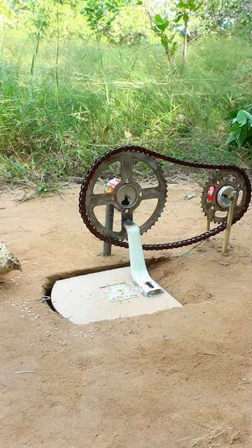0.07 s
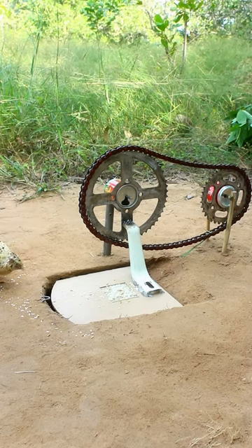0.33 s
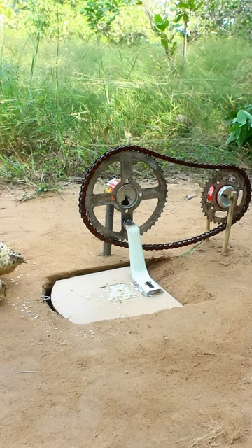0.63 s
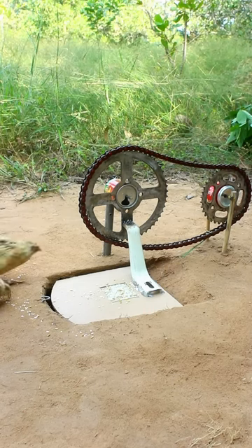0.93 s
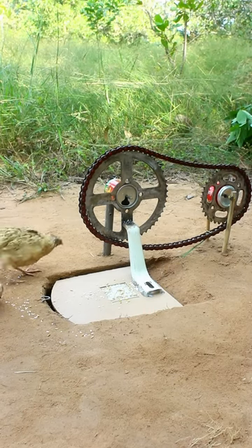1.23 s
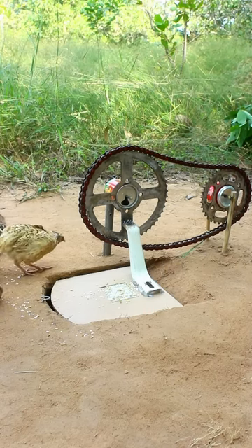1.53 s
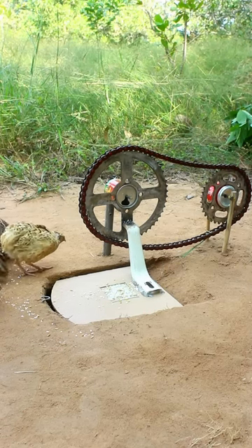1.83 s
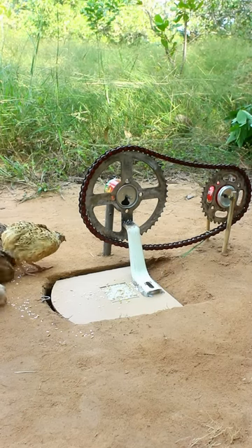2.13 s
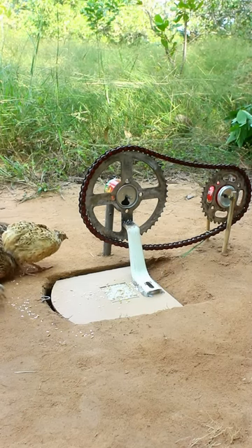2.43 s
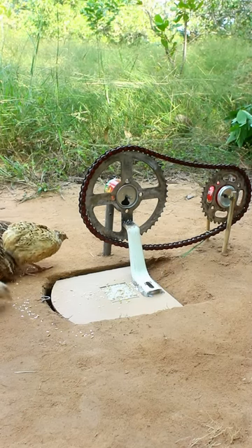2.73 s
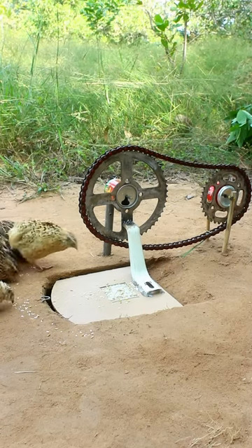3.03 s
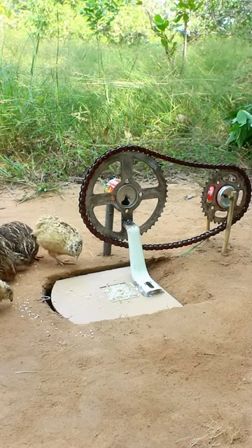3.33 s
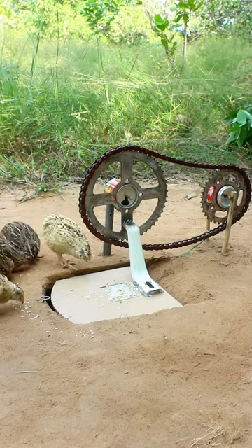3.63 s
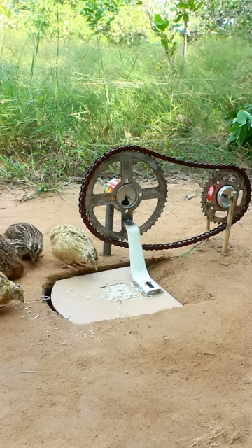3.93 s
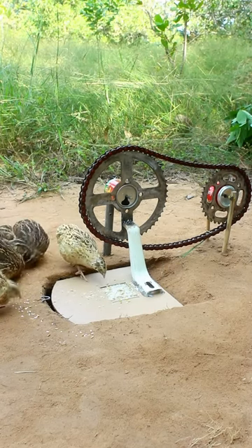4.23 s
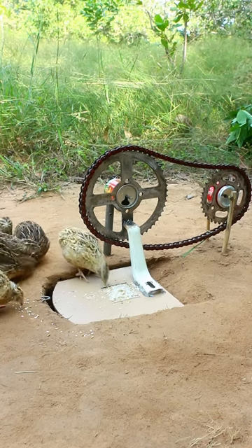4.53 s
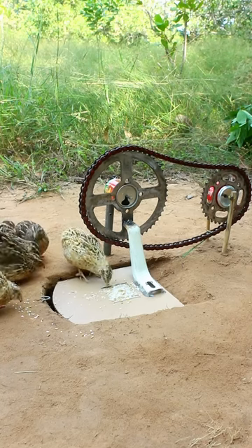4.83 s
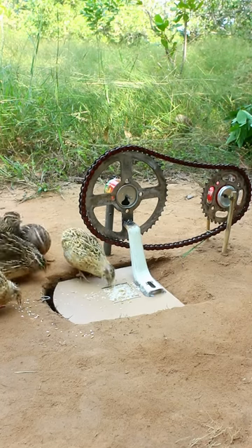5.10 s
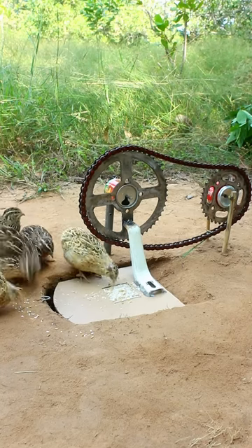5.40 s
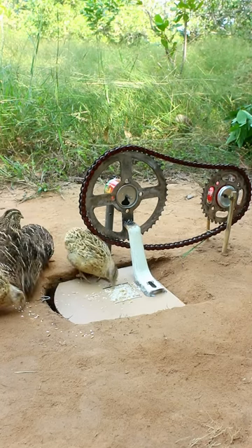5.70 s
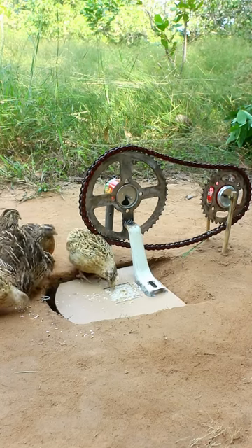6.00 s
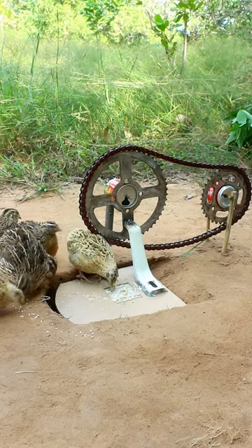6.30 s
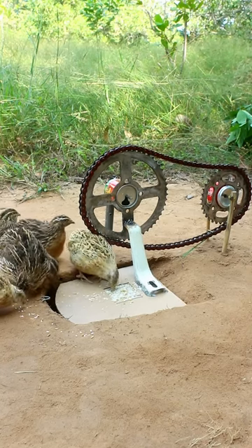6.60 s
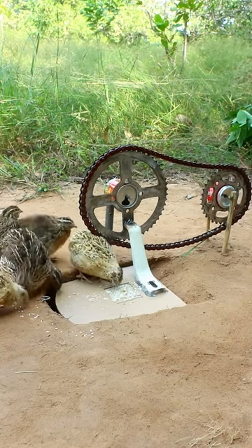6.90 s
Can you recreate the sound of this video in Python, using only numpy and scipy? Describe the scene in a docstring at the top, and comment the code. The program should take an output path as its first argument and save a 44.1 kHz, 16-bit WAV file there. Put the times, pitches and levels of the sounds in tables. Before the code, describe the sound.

A steady open-air hiss and low rumble runs throughout, about seven seconds. From 0.5 seconds, birds give soft, scattered two-note whistles, peeps, chirps and coos, with raspy twittering around 3.4 to 4.4 seconds and the last peep near 5.4. Faint light clacks and a rustle of sand come at about 2.7 seconds.

A faint first peck at 4.2 seconds and soft footfalls lead into the main sound: from 4.6 seconds to the end, a quail pecks grain off a thin platform close by, roughly four times a second. These sharp, crunchy taps are much louder than the background, and each rings the board briefly. A harder clack lands at 4.7 seconds amid rustling sand. Loose seeds snap and skitter between 4.6 and 5.2 seconds, and again lightly near 6.7. Feet thud softly around 5.6, and one of the strongest pecks falls at 6.6.

```python
"""Sharp, crunchy pecks on ringing board, close by: a quail eats grain off a thin platform over a pit.
Each peck is a blow, a rebound and a lift-off that ring the platform and crunch the seed.
Loose seeds skitter, feet thud, sand rustles and something harder clacks lightly.
Birds whistle and twitter softly over a steady open-air hiss and rumble."""
import sys
import numpy as np
from scipy import signal
from scipy.fft import rfft, irfft
from scipy.io import wavfile

SR = 44100
rng = np.random.default_rng(int(sys.argv[2]) if len(sys.argv) > 2 else 0)


def materialize(psi):
    """Save the field psi as 16-bit PCM at rate SR to the path in sys.argv[1].

    A 1-D psi becomes a single channel; in a 2-D psi each row is a channel.
    """
    bounded = np.clip(np.atleast_2d(psi).T, -1, 1)
    quanta = np.round(bounded * 32767).astype(np.int16)
    wavfile.write(sys.argv[1], SR, quanta)


N = 306495
T = np.arange(N) / SR
RING_T = np.arange(SR // 4) / SR

# seed noise spectrum: f/Hz, level/dB
SEED_SPECTRUM = [(300, -1.5), (900, 3), (2200, 9), (3200, -1), (5000, -1.5), (7100, 5), (8400, 2.5),
                 (10500, 5.5), (13000, -0.5), (16000, -7)]
# showers of scattered seed: t/s, length/s, level/dB
SHOWERS = [(4.565, .14, -52), (4.779, 0.063, -53), (5.011, 0.11, -55.5), (5.084, 0.089, -56),
           (6.65, 0.076, -54.5)]


def undb(db):
    """Decibels to gain."""
    return 10 ** (np.asarray(db) / 20)


def add(track, start_s, sound):
    """Mix a sound into a track."""
    i = max(int(start_s * SR), 0)
    track[i:i + len(sound)] += sound[:N - i]


def decay(t60_s):
    """Envelope falling 60 dB in t60_s."""
    return np.exp(-np.log(1000) * RING_T / t60_s)


def highpass(x, hz, order):
    """Butterworth high-pass."""
    return signal.sosfilt(signal.butter(order, hz, "high", fs=SR, output="sos"), x)


def bin_gains(points, size):
    """FFT bin gains from (f/Hz, level/dB) points, joined over log frequency."""
    hz, db = np.transpose(points)
    return undb(np.interp(np.log(np.fft.rfftfreq(size, 1 / SR) + 1), np.log(hz), db))


def colour(x, points, size=1024):
    """Minimum-phase filter of unit power gain, shaped by (f/Hz, level/dB) points."""
    cepstrum = irfft(np.log(bin_gains(points, size)))
    cepstrum[1:size // 2] *= 2
    cepstrum[size // 2 + 1:] = 0
    response = irfft(np.exp(rfft(cepstrum)))
    return signal.fftconvolve(x, response / np.linalg.norm(response))[:len(x)]


def crackle(rate_hz, spread_db):
    """Dense clicks of uneven size, rms 1."""
    clicks = (rng.random(N) < rate_hz / SR) * rng.choice([-1, 1], N)
    clicks = clicks * undb(spread_db * np.minimum(rng.exponential(size=N), 4))
    return clicks / clicks.std()


def jitter(t, rate_hz):
    """Random values joined by straight lines."""
    return np.interp((t - t[0]) * rate_hz, np.arange(256), rng.standard_normal(256))


def air(mid_rms_db=-52.5):
    """Steady rumble, alike in both ears, under a wide hiss."""
    # open-air spectrum: f/Hz, relative level/dB
    spectrum = [(12, -40), (20, -6), (26, -7), (95, -0.5), (192, -7), (221, -10.5), (355, -15.5),
                (554, -17.5), (603, -19), (942, -21), (1020, -22), (3220, -22), (4250, -25), (13700, -27),
                (15800, -29)]
    # stereo width: f/Hz, side re mid/dB
    width = [(30, -3.5), (100, -18.5), (300, -7), (1000, -2.5), (3000, -2.5), (8000, 0.5), (15000, 0)]
    gain = bin_gains(spectrum, N)
    mid = irfft(rfft(rng.standard_normal(N)) * gain, N)
    side = irfft(rfft(rng.standard_normal(N)) * gain * bin_gains(width, N), N)
    return undb(mid_rms_db) * np.array([mid + side, mid - side]) / mid.std()


def surroundings(x, t60_s=0.078, build_s=0.0052, wet_db=-23, lowest_hz=350):
    """Ground and bushes scatter a faint short tail to each side; long waves pass them by."""
    tails = rng.standard_normal((2, len(RING_T))) * decay(t60_s) * (1 - np.exp(-RING_T / build_s))
    scattered = highpass(x, lowest_hz, order=1)
    wet = [signal.fftconvolve(scattered, tail / np.linalg.norm(tail))[:N] for tail in tails]
    return undb(wet_db) * np.array(wet)


def note(turn_s, shape, turn_hz, db, rasp_db=-15, waver=0.013, overtone_db=-22, bend=1.4):
    """Wavering bird note gliding through a turning pitch; returns start/s, sound."""
    before_s, after_s, start_ratio, end_ratio = shape
    t = np.arange(-before_s, after_s, 1 / SR)
    from_turn = np.abs(np.where(t < 0, t / before_s, t / after_s)).clip(0, 1)
    hz = turn_hz * (1 + (np.where(t < 0, start_ratio, end_ratio) - 1) * from_turn ** bend)
    phase = 2 * np.pi * np.cumsum(hz * (1 + waver * jitter(t, rate_hz=424))) / SR
    tone = np.sin(phase) + undb(overtone_db) * np.sin(2 * phase)
    hoarse = jitter(t, rate_hz=900) * np.sin(phase) + jitter(t, rate_hz=830) * np.cos(phase)
    rasp = undb(rasp_db)
    swell = (1 - from_turn ** 6) / np.hypot(1, rasp)
    return turn_s - before_s, undb(db) * swell * (tone + rasp * hoarse)


def birds(call_gap_s=.067, call_high_hz=1377, twitter_step_s=.04, twitter_spread=0.0287):
    """Clear two-note calls and peeps, hoarser chirps, soft coos, raspy twitter at uneven pitch."""
    # glides: time before turn/s, time after/s, start and end pitch re turn
    low_swoop = (0.048, 0.0142, 1.38, 2.2)
    high_swoop = (.041, 0.0126, 1.85, 1.57)
    peep = (.034, 0.0183, 1.55, 1.65)
    chirp = (.031, 0.0146, .42, .72)
    coo = (0.028, 0.017, 1.04, 0.94)
    twitter = (.02, .018, 1.15, 1.14)
    # two-note calls, at the first turn: t/s, f/Hz, level/dB
    calls = [(0.754, 1050, -56), (1.226, 1030, -63), (1.452, 1146, -56.5), (2.85, 1094, -56),
             (4.131, 1035, -50.5)]
    # single peeps, at the turn: t/s, f/Hz, level/dB
    peeps = [(1.002, 1550, -53), (4.638, 1506, -50), (5.441, 1413, -51.5)]
    # rising chirps, at the top: t/s, f/Hz, level/dB
    chirps = [(1.196, 1154, -59), (1.929, 1130, -55), (2.426, 1510, -50.5)]
    # nearly level coos: t/s, f/Hz, level/dB
    coos = [(1.965, 462, -51.5), (1.966, 756, -56), (5.362, 1178, -54.5)]
    # twitter bouts: t/s, length/s, f/Hz, level/dB
    bouts = [(0.47, .04, 2880, -63), (3.413, .08, 3085, -50.5), (3.602, .12, 3230, -58),
             (4.208, .08, 2750, -55), (4.315, .12, 3230, -60)]
    out = np.zeros(N)
    for s, hz, db in calls:
        add(out, *note(s, low_swoop, hz, db))
        add(out, *note(s + call_gap_s, high_swoop, call_high_hz, db + 2))
    for s, hz, db in peeps:
        add(out, *note(s, peep, hz, db))
    for s, hz, db in chirps:
        add(out, *note(s, chirp, hz, db, rasp_db=-9))
    for s, hz, db in coos:
        add(out, *note(s, coo, hz, db))
    for s, length_s, hz, db in bouts:
        for turn_s in np.arange(s + twitter_step_s / 2, s + length_s, twitter_step_s):
            turn_hz = hz * (1 + twitter_spread * rng.standard_normal())
            add(out, *note(turn_s, twitter, turn_hz, db, rasp_db=0))
    return out


def sand():
    """Fine grit shifts under feet and feathers."""
    # rustle envelope: t/s, level/dB
    rustle = [(0, -67.5), (2.55, -67), (2.68, -58), (2.9, -56), (3.0, -67), (4.35, -62.5), (4.6, -52.5),
              (4.75, -59.5), (6.95, -67.5)]
    # grit spectrum: f/Hz, level/dB
    spectrum = [(300, -6.5), (1200, -6), (2600, -5), (4500, -11), (8000, -14), (16000, -18.5)]
    grit = colour(crackle(rate_hz=2800, spread_db=3.5), spectrum)
    return undb(np.interp(T, *np.transpose(rustle))) * grit


def strike(modes, contact_ms, weights_db, crowded_db, crowded_t60_s):
    """A force pulse drives main modes and a wash of crowded ones; longer contact sounds duller."""
    # spectrum of the small, crowded modes: f/Hz, level/dB
    crowded = [(150, -33.5), (400, -1.5), (600, -2.5), (1000, -9.5), (2000, -5.5), (3200, -2), (5000, -41),
               (16000, -60)]
    hz, db, t60_s = np.transpose(modes)[:, :, None]
    ring = (undb(db + weights_db[:, None]) * decay(t60_s) * np.cos(2 * np.pi * hz * RING_T)).sum(0)
    wash = colour(rng.standard_normal(len(RING_T)) * decay(crowded_t60_s), crowded)
    rise_s = max(contact_ms, .02) / 4000
    t = RING_T[:SR // 100]
    force = t * np.exp(-t / rise_s)
    return signal.fftconvolve(ring + undb(crowded_db) * wash, force / force.sum())[:len(RING_T)]


def clacks():
    """Light, bassless knocks on something harder than the platform."""
    # knocks: t/s, level/dB, contact/ms
    knocks = [(.311, -54, .2), (2.6682, -50.5, .03), (2.74, -60, .05), (2.799, -55, .23),
              (4.6462, -44.5, 0.087), (4.7185, -25.5, .64), (4.862, -53, .05)]
    # hard object's modes: f/Hz, level/dB, t60/s
    modes = [(940, 3, 0.0061), (1270, 3, 0.023), (1960, -25, 0.018), (2114, 9, 0.022), (2360, 2, 0.016),
             (2930, 3, 0.028)]
    out = np.zeros(N)
    for s, db, contact_ms in knocks:
        weights_db = rng.standard_normal(len(modes))
        add(out, s, undb(db) * strike(modes, contact_ms, weights_db, crowded_db=-6, crowded_t60_s=0.091))
    return highpass(out, 600, order=2)


def bounces(count=3, above_shower_db=10, spread_db=8.5, top_hz=7600):
    """A few seeds land at random in each shower: t/s, level/dB, f/Hz."""
    return [(s + length_s * rng.random(),
             db + above_shower_db + spread_db * rng.standard_normal(),
             top_hz * rng.uniform(0.86, 1.0))
            for s, length_s, db in SHOWERS for _ in range(count)]


def seeds(tick_s=0.0012, tick_db=-5, ring_s=0.00085, ring_db=-7):
    """A snapping or bouncing seed gives a sharp tick with a very short ring."""
    # single seeds snapping: t/s, level/dB, f/Hz
    snaps = [(4.6029, -33, 9150), (4.85, -38, 8950), (4.9164, -31, 6900), (4.948, -38, 7500),
             (5.085, -26.5, 8700), (5.092, -28.5, 6860), (5.109, -35, 7840), (5.1269, -32, 10600),
             (5.6423, -42, 8000)]
    out = np.zeros(N)
    for s, db, hz in snaps + bounces():
        tick = undb(tick_db) * rng.standard_normal(len(RING_T)) * np.exp(-RING_T / tick_s)
        ring = undb(ring_db) * np.sin(2 * np.pi * hz * RING_T) * np.exp(-RING_T / ring_s)
        add(out, s, undb(db) * (tick + ring))
    return colour(out, SEED_SPECTRUM)


def blows(rebound_s=.003, rebound_ratio=0.53, lift_ratio=0.47, step_low_db=28):
    """Beak and foot contacts: t/s, level/dB, contact/ms, lowest-mode boost/dB, crunch/dB."""
    # pecks: t/s, level/dB, contact/ms, lowest-mode boost/dB, crunch/dB, rebound/dB,
    # lift-off delay/s, lift-off/dB; crunch, rebound and lift-off levels re the blow
    pecks = [(4.1546, -49.5, 0.35, 28, -18, -21, 0.0054, -4),
             (4.5545, -24, 0.89, -5, -8.5, -9, 0.0093, -15),
             (4.7806, -18.5, 0.87, 9, -16.5, -12, 0.023, -15.5),
             (4.9926, -17.5, .44, 5, -5, -7.5, 0.0063, -24),
             (5.2778, -25, 0.43, 5, -3.5, -8.5, .016, -15.5), (5.6128, -40.5, .17, 18, 7.5, -9, 0.0073, -9),
             (5.7262, -21, 0.76, 6, -10, -2, 0.01, -21), (5.9389, -25, 1.03, 0.5, -9, -6.5, 0.012, -17.5),
             (6.1401, -20.5, 1.04, -9, -4, -12.5, .008, -2.5),
             (6.3726, -18.5, 0.7, 0.5, -7.5, -11, .022, -10.5),
             (6.6186, -15.5, 1.13, 3, -12.5, -7, 0.016, -14), (6.829, -28, 1.8, 17.5, -14, 1, 0.018, -10.5)]
    # footfalls: t/s, level/dB, contact/ms, crunch re footfall/dB
    steps = [(4.394, -56.5, 1.6, -20), (4.486, -52, 1.3, -14), (4.5196, -51.5, 0.26, 16),
             (5.516, -55.5, 0.29, -8), (5.560, -54.5, 0.22, 13), (5.629, -41.5, 4.4, -17)]
    rows = []
    for s, db, contact_ms, low_db, crunch_db, rebound_db, lift_s, lift_db in pecks:
        rows.append((s, db, contact_ms, low_db, db + crunch_db))
        # the platform springs back against the beak
        rows.append((s + rebound_s, db + rebound_db, contact_ms * rebound_ratio, 0, db + crunch_db + 1))
        # the beak flicks it while lifting the seed
        rows.append((s + lift_s, db + lift_db, contact_ms * lift_ratio, 0, db - 16.5))
    for s, db, contact_ms, crunch_db in steps:
        # a soft foot bends the whole platform
        rows.append((s, db, contact_ms, step_low_db, db + crunch_db))
    return rows


def grain(crunch_s=0.0012, settle_s=0.016, settle_db=-19, trim_db=-2, lead_s=0.00028):
    """Seed crunches just before each blow meets the platform, settles, and hisses when scattered."""
    envelope = np.zeros(N)
    burst = np.exp(-RING_T / crunch_s) + undb(settle_db) * np.exp(-RING_T / settle_s)
    for s, *_, crunch_db in blows():
        add(envelope, s - lead_s, undb(crunch_db + trim_db) * burst)
    for s, length_s, db in SHOWERS:
        add(envelope, s, undb(db) * np.sin(np.pi * np.minimum(RING_T / length_s, 1)) ** 2)
    husks = crackle(rate_hz=22000, spread_db=1.5)
    return colour(envelope * husks, SEED_SPECTRUM)


def platform(upper_hz=420, spread_hz=1500, spread_width_hz=900, leak_hz=143):
    """The thin platform rings; each blow lands on another spot, so the upper modes' mix varies."""
    # platform modes: f/Hz, level/dB, t60/s
    modes = [(166.4, -10, 0.15), (215.3, -3.5, 0.074), (294, 1, 0.053), (335, -2, 0.043), (470, -8, 0.043),
             (713, -8, 0.019), (880, 5, 0.026), (1123, -7.5, 0.032), (1253, -3.5, 0.029),
             (1510, -0.5, 0.013), (1797, 3, 0.019), (2110, -3.5, 0.036), (2530, -16, 0.12),
             (2730, -46, .03), (3587, -4, 0.062), (4150, -2, 0.04), (5570, -5, 0.034)]
    is_upper = np.array(modes)[:, 0] > upper_hz
    out = np.zeros(N)
    for s, db, contact_ms, low_db, _ in blows():
        weights_db = is_upper * rng.uniform(-4, 4, len(modes))
        weights_db[0] += low_db
        add(out, s, undb(db) * strike(modes, contact_ms, weights_db, crowded_db=-9, crowded_t60_s=0.081))
    # all-pass: bending waves travel at different speeds and spread the first spike
    band = signal.lfilter(*signal.iirpeak(spread_hz, spread_hz / spread_width_hz, fs=SR), out)
    dispersed = out - 2 * band
    # air slips round the edge, so the deepest bass is not radiated
    return highpass(dispersed, leak_hz, order=2)


def scene(side_db=-9):
    """Centred sources in stereo air and scatter; crisp seed and sand noise spreads to the sides."""
    centre = platform() + grain() + seeds() + clacks() + birds() + sand()
    side = undb(side_db) * highpass(grain() + seeds() + sand(), 3000, order=1)
    return centre + np.array([side, -side]) + surroundings(centre) + air()


def record(dry):
    """Steep low-pass at 16.1 kHz."""
    return signal.sosfilt(signal.ellip(10, .1, 70, 16100, fs=SR, output="sos"), dry)


dry = scene()
out = record(dry)
materialize(out)
```